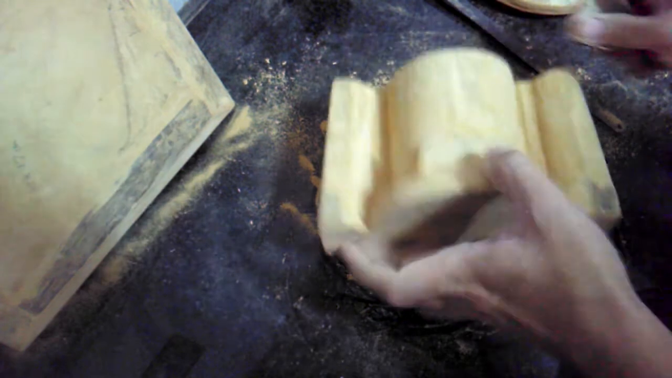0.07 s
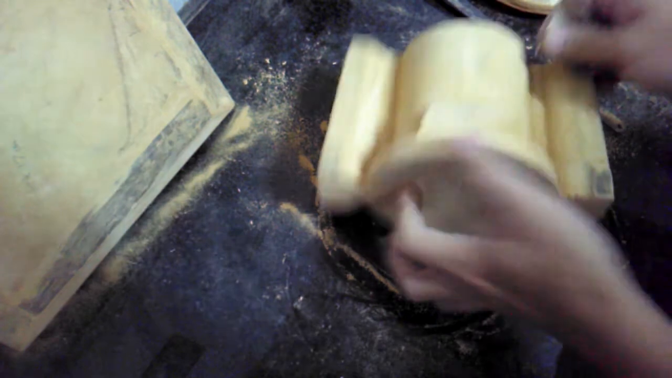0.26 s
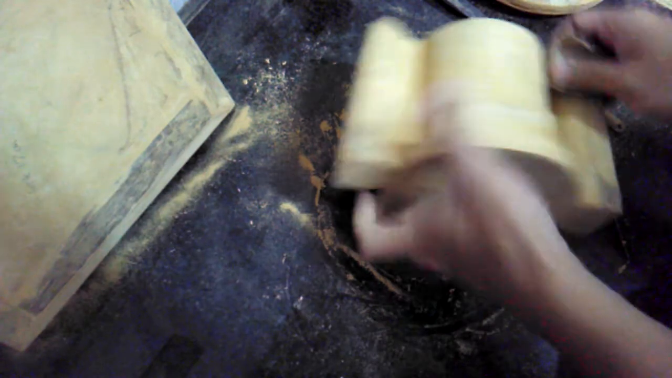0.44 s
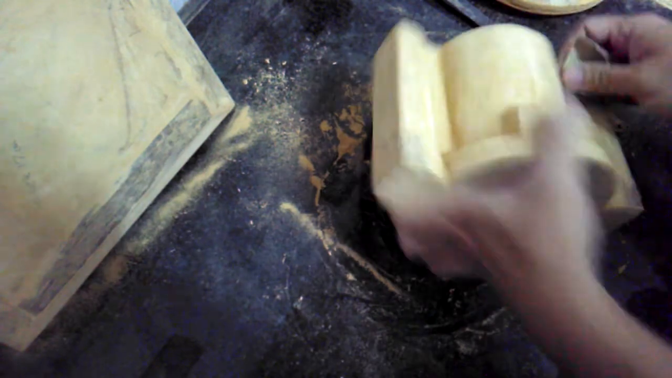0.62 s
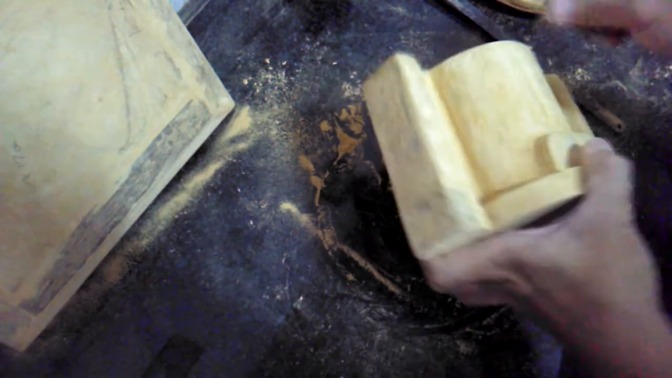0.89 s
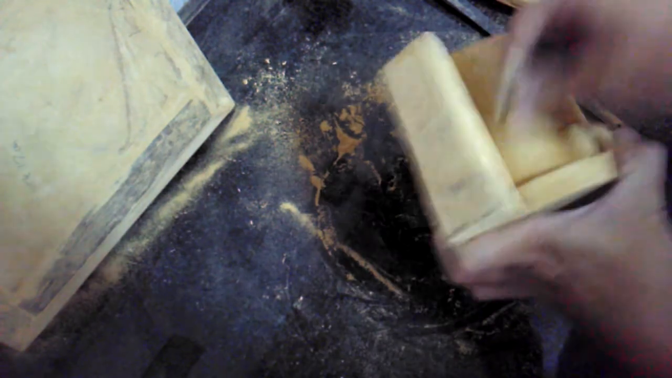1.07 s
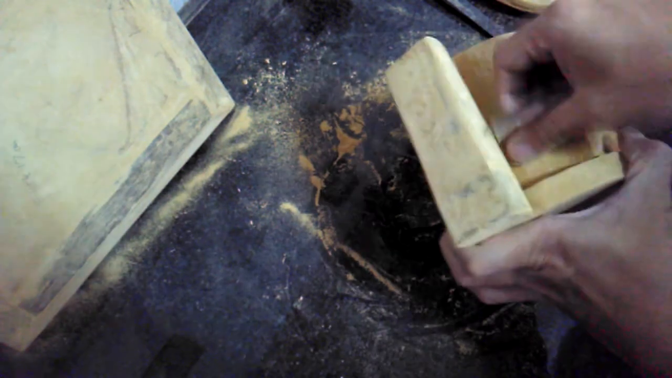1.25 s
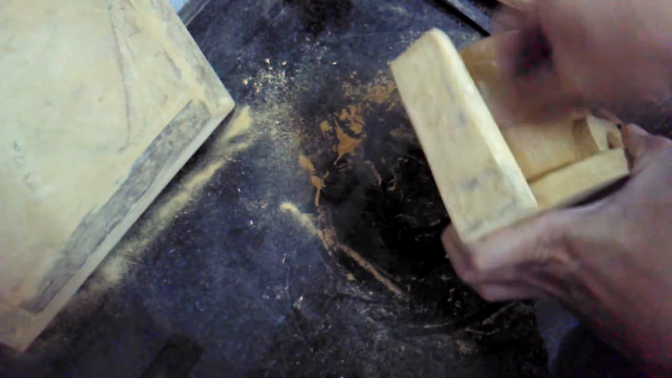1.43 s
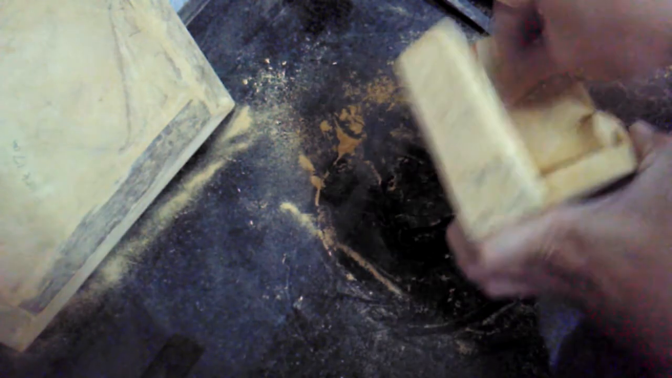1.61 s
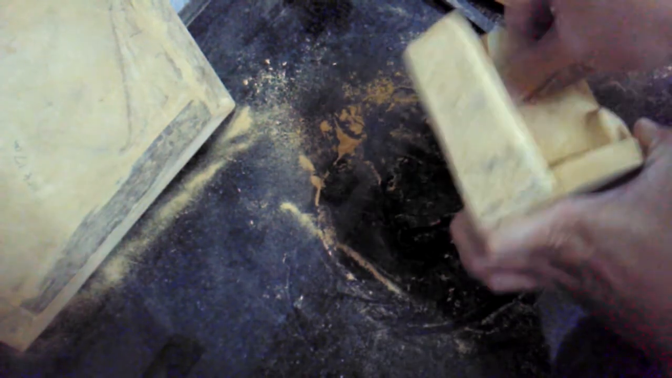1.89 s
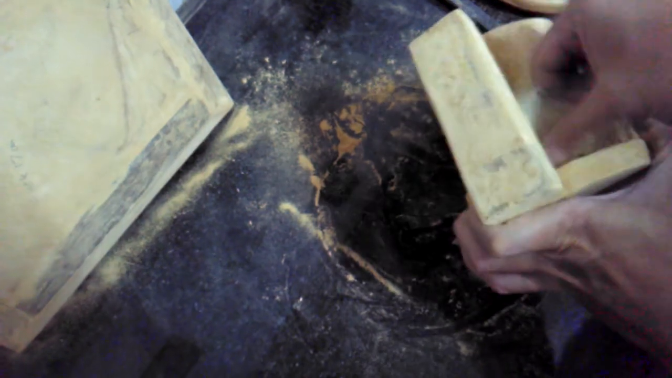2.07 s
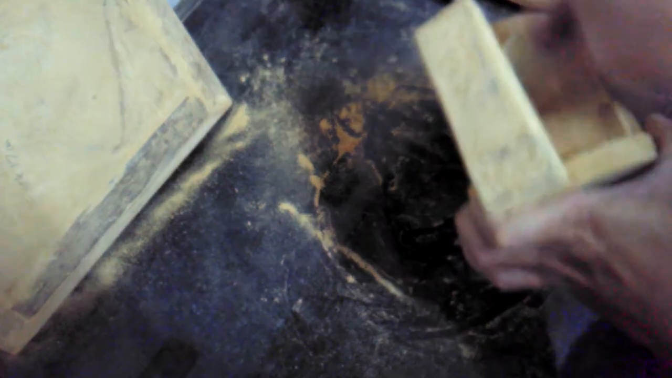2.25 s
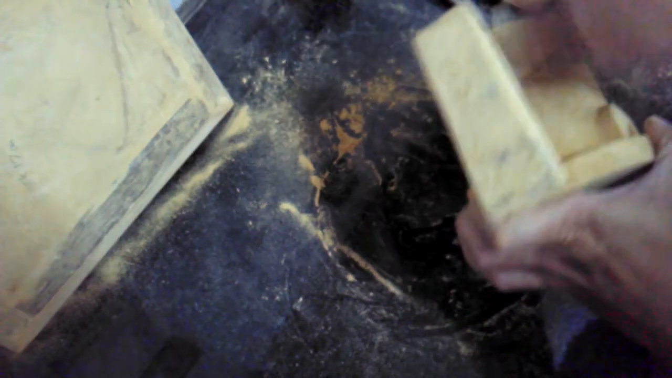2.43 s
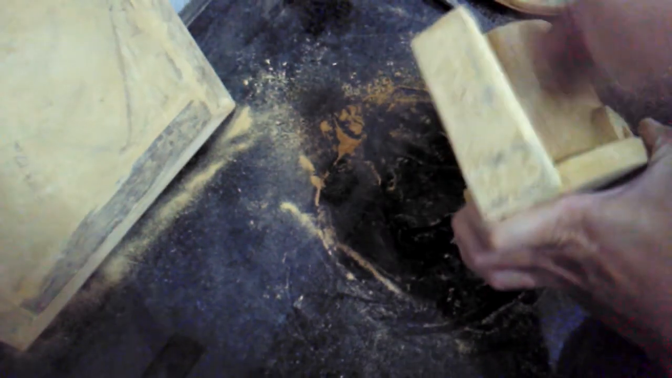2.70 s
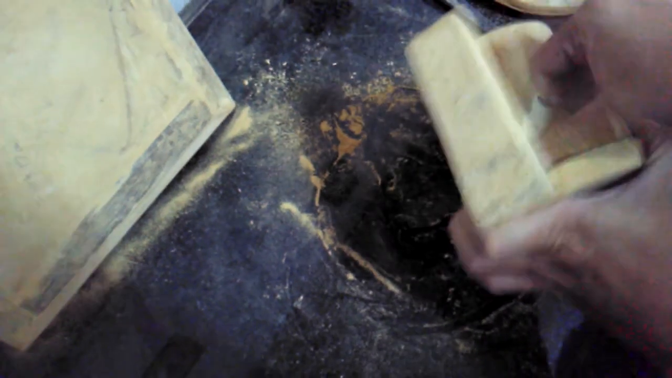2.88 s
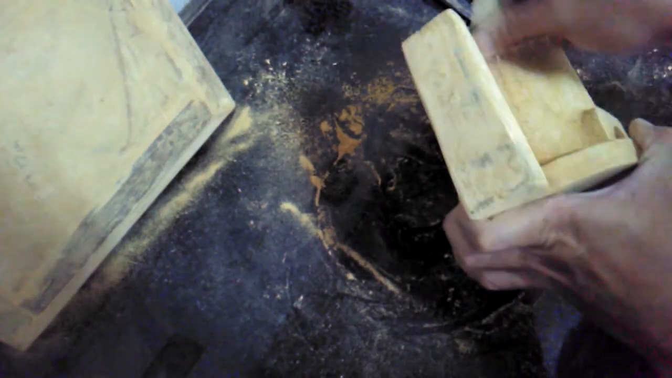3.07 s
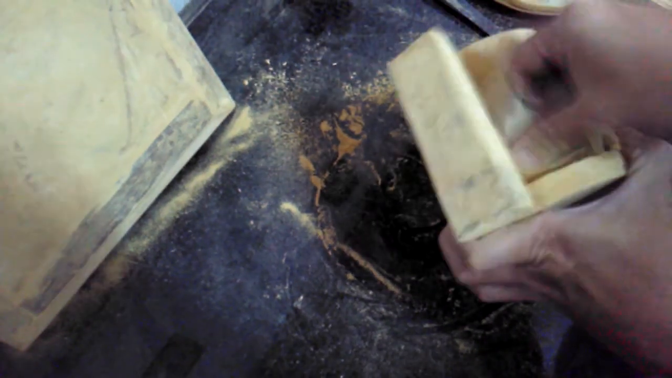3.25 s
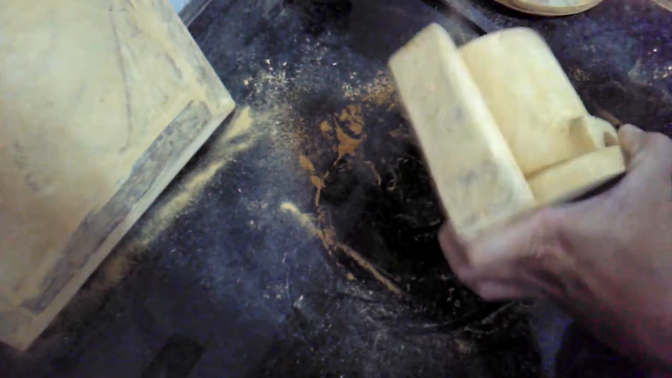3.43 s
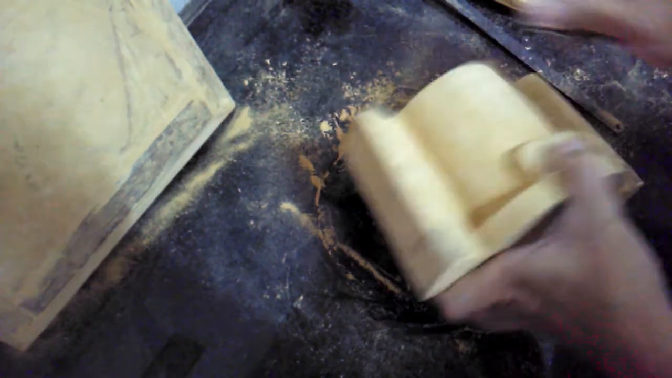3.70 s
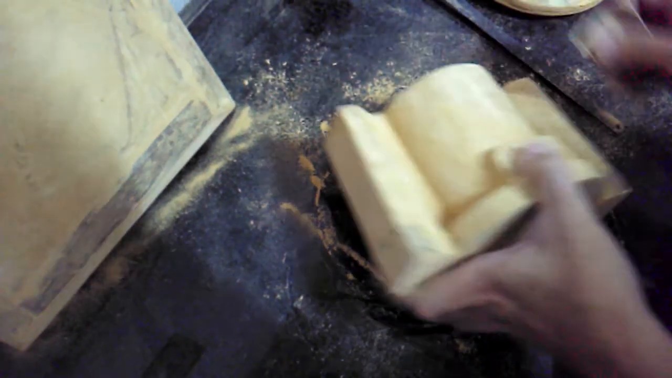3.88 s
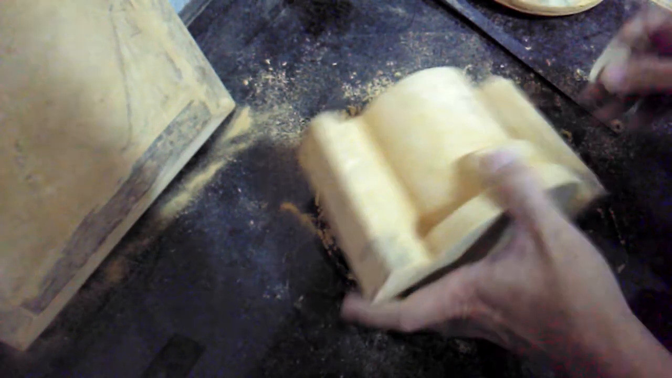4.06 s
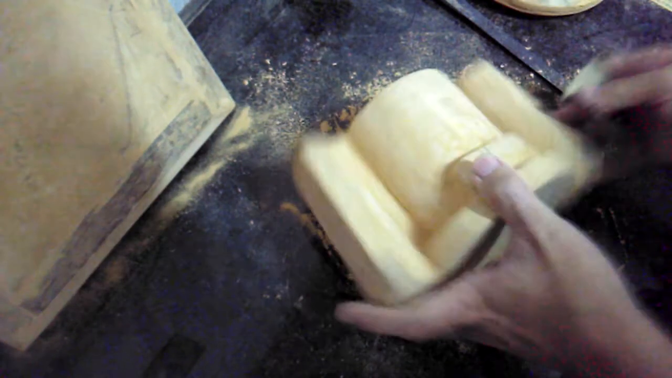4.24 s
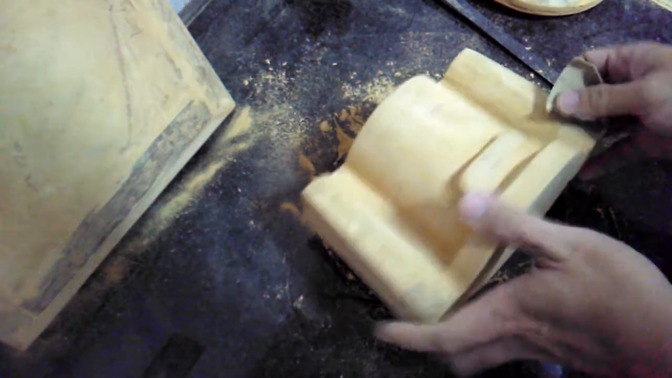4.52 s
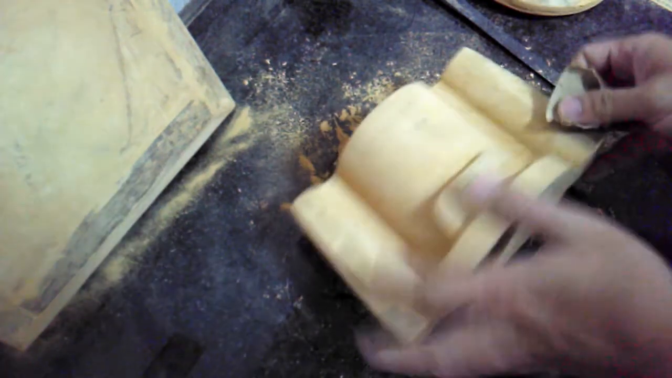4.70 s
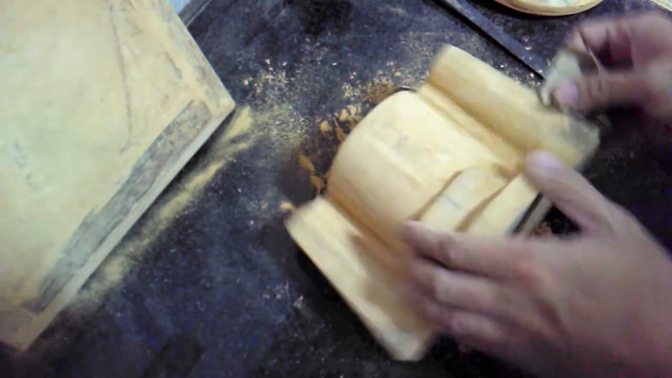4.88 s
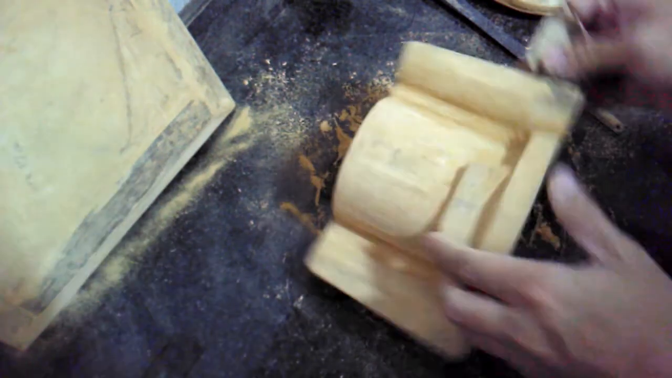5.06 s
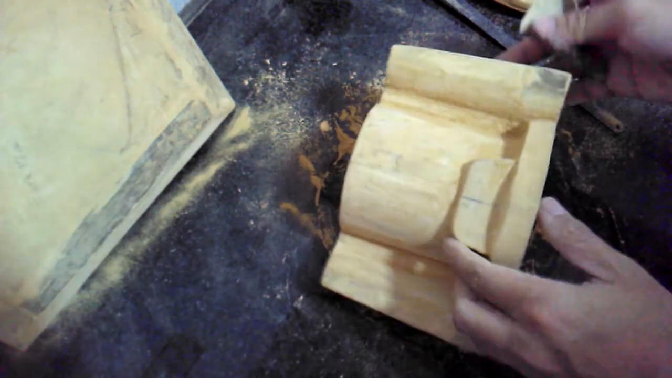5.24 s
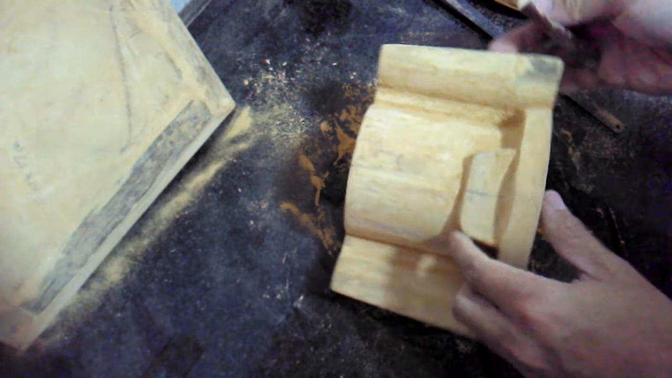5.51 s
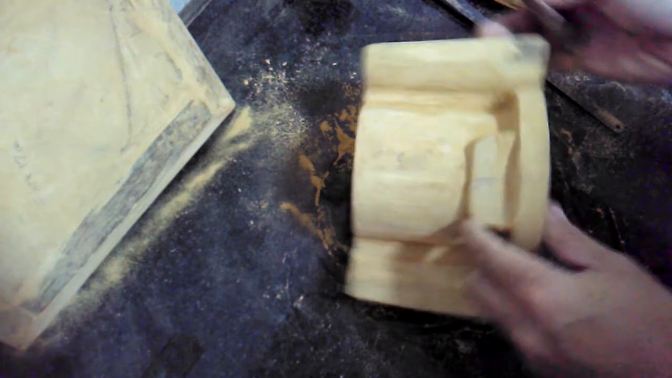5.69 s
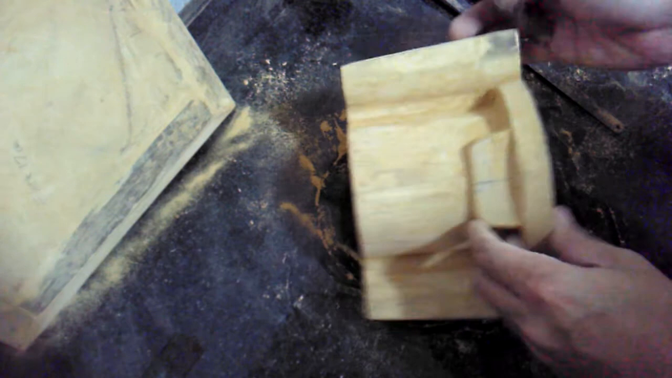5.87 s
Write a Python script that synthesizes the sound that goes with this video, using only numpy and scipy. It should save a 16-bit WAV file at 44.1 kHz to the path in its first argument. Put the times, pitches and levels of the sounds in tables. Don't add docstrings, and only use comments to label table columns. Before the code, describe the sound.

Close to one camera microphone in a small workshop, a hollow wooden piece is turned with faint papery rustles and knocked sharply on the bench. Sandpaper then rubs it in sixteen quick, dry, alternating strokes, the last longer and ending in a loud click off the edge. Afterwards come soft rubs and light knocks, with low outdoor rumble behind and a far engine near the end.

```python
import sys
import numpy as np
from scipy import signal
from scipy.fft import rfft, irfft, next_fast_len
from scipy.io import wavfile
from scipy.ndimage import uniform_filter1d, map_coordinates

SR = 44100
rng = np.random.default_rng(int(sys.argv[2]) if len(sys.argv) > 2 else 0)


def elevation(decibels):
    levels = np.asarray(decibels, float)
    return 10 ** (levels / 20)


def pcm_store(signal):
    levels = np.round(np.clip(np.atleast_2d(signal), -1, 1) * 32767)
    wavfile.write(sys.argv[1], SR, levels.astype(np.int16).T)


N = 261495

# start in seconds, length in seconds, level in dB,
# pressure growth in dB, extra wood contact in dB.
STROKES = [(1.208, 0.085, -59, -15, 0), (1.365, 0.093, -47.5, 2.5, 0), (1.515, 0.077, -40, 11.5, -0.7),
           (1.634, 0.12, -43.5, -8, -2), (1.776, 0.11, -40.5, -1, 0), (1.897, 0.11, -46, 5, -0.8),
           (2.03, 0.11, -42, 17.5, 0.2), (2.142, 0.13, -48, 15, -1), (2.321, 0.096, -43, 12.5, -0.1),
           (2.436, 0.13, -43.5, 4.5, -1), (2.609, 0.13, -40.5, 7, 2), (2.742, 0.13, -43.5, 2.5, 1.2),
           (2.9, 0.11, -38, 0.3, -1.1), (3.02, 0.16, -41, -4.5, 0), (3.189, 0.14, -38, 2, -3.5),
           (3.325, 0.25, -38.5, 11.5, 3)]
# middle band in dB, its growth in dB, upper band in dB,
# bite from 0 to 1, share of the stroke before it grips.
SEATING = [(-13, 2, -13, 0.4, 0.13), (-7, 2, -28, 0.25, 0.25), (-12, 0, -8, 0, .1), (-9, 0, -15, 0.2, .085),
           (-14, 6, -13, 0.1, .12), (-13, -2, -14, 0, .1), (-9, 3, -12.5, 0.24, 0.16),
           (-9.5, -8, -12, 0.3, 0.2), (-13, 0, -14, 0, .1), (-9, -3, -23, 0.23, .19), (-15, 1, -19, 0, .1),
           (-14, 0, -15, 0, 0.11), (-9, 0, -16, 0.1, 0.23), (-8.5, -4, -19, 0.22, .13),
           (-13.5, 4, -13, 0.2, 0.095), (-4.5, 8, -15.5, 0.36, 0.11)]
# wood in dB, fine dust in dB, late lean on the wood in dB, cavity in dB.
PUSH = (-8.5, -15.5, -1, -6.5)
PULL = (-7, -12.5, 2, -2.5)
# centre in Hz, width in Hz, level in dB.
PAPER = [(3670, 270, -18.5), (3860, 380, -4.5), (4400, 370, -6.5), (4900, 350, 1.5), (5530, 580, -6.5),
         (5900, 720, -14.5)]
# centre in Hz, width in Hz, level in dB.
WOOD = [(1696, 517, -8.5), (2314, 286, -1), (2954, 247, 0)]
# centre in Hz, width in Hz, level in dB.
HOLLOW = [(620, 1050, -22), (1068, 310, 5.5)]
# centre in Hz, width in Hz, level in dB.
MIDDLE = [(3320, 330, -1), (3896, 270, 0)]
UPPER = [(5750, 330, 1.5), (6470, 540, -3.5)]
# frequency in Hz, density in dB per Hz.
DUST = [(4120, -31), (7000, -2.5), (7670, -2), (11800, -8), (13900, -12.5), (14500, -19)]
# time in seconds, peak in dB, pitch in Hz, length in seconds.
CATCHES = [(0.657, -65, 1420, 0.002), (0.672, -61, 1520, 0.0026), (1.003, -55, 2650, 0.0019),
           (1.029, -47, 2700, 0.00076), (1.39, -38.5, 3200, 0.0073), (1.51, -41.5, 2300, 0.0063),
           (1.6447, -36, 4640, 0.0023), (2.176, -51, 4650, 0.002), (2.475, -39, 4530, 0.0017),
           (2.9228, -40.5, 5110, 0.0015), (3.204, -41, 4500, 0.002), (3.4525, -19.5, 1960, 0.0031),
           (4.445, -65, 2550, 0.00077)]
# time in seconds, peak in dB, pitch in Hz,
# length in seconds.
TICKS = [
    (5.3, -65, 2600, .001),
    (0.656, -58, 5600, 0.00075),
    (1.2, -58, 5000, .002),
    (1.6445, -47, 8500, .001),
]

# time in seconds, peak in dB, thump in dB, rattle in dB, hollow ring in dB.
KNOCKS = [(0.002, -42.5, -14, -10, 5.5), (0.622, -30.5, -9, -24, -4.5), (0.639, -39.5, -2, -12, -11),
          (0.655, -44.5, -10, -4.5, -9), (0.694, -25.5, -17, -23, 0), (0.814, -14, -32, -16.5, -4),
          (0.827, -21.5, -14.5, -14.5, -7), (0.868, -36, -9.5, -43.5, 15.5), (3.834, -35, -35, -46, 3),
          (4.144, -31, -11.5, -36, 5.5), (5.066, -33, -10.5, -13, -2), (5.083, -41, 0, -26, -11),
          (5.092, -39, -7, -16, -13), (5.119, -34, -6.5, -26, 8.5), (5.565, -61, 8.5, -35, 19)]
# slap in dB, pitch in Hz, length in seconds.
SLAPS = [(-1.5, 177, 0.0025), (3.5, 250, 0.0028), (5, 170, .003), (3, 164, 0.0027), (1.5, 283, 0.0017),
         (0.5, 420, 0.0028), (2.5, 342, 0.0027), (4, 300, 0.0033), (3, 261, 0.0023), (3, 253, 0.0042),
         (2.5, 298, 0.004), (3, 180, .003), (1.5, 210, .003), (3, 244, 0.0039), (1, 98, .003)]
# frequency in Hz, level in dB, time to fall 60 dB in seconds.
BENCH = [(69.1, -4, 0.22), (125.8, -7, 0.18), (185.3, -6.5, 0.15), (232, -12.5, 0.097), (274, 1, 0.083),
         (414.7, 0.5, 0.16), (480.3, 0, 0.075), (540, -7.5, 0.086), (647.4, -4, 0.075), (624, -29.5, 0.91),
         (760, -13, 0.1), (810, -9.5, 0.085), (940, -16, 0.058), (1225, -24, 0.036)]
# frequency in Hz, level in dB, time to fall 60 dB in seconds.
AIR_MODES = [(327.8, -4.5, 0.27), (349.7, -6, 0.37)]
# frequency in Hz, density in dB per Hz.
RATTLE = [(500, -35.5), (850, 7), (1200, 0.5), (1900, -8.5), (3000, -12), (5500, -21), (9000, -53)]
# centre in Hz, width in Hz, level in dB.
CLATTER = [(783, 270, 6), (1080, 116, 1), (1460, 77, -14), (1974, 195, -6)]
# start in seconds, length in seconds, level in dB,
# upper modes in dB.
SKIDS = [
    (.622, .01, -57, -12),
    (0.646, 0.036, -61, -13),
    (0.653, 0.01, -65.5, 8),
    (.671, 0.0079, -72, 9),
    (.696, 0.0091, -61, -3.5),
    (0.833, 0.034, -62.5, -16),
    (4.14, 0.022, -73, -15),
    (5.12, 0.015, -68.5, -21),
]
# centre in Hz, width in Hz, level in dB.
SKID_MODES = [
    [(1100, 64, 0)],
    [(1470, 99, 2.5), (1960, 100, -1.5)],
]

# peak in seconds, rise in seconds, fall in seconds,
# paper in dB, wood over paper in dB.
RUSTLE = [
    [(0.04, 0.058, 0.15, -71.5, -14), (0.18, 0.1, 0.079, -67, -11), (0.245, 0.045, 0.029, -56, -8.5),
     (0.278, 0.031, 0.09, -59, -5.5), (0.398, 0.049, 0.027, -75, -5)],
    [(1.008, .003, 0.079, -58, 3), (1.24, 0.05, 0.16, -71.5, 9.5), (3.54, .07, 0.086, -64, 1)],
    [(3.845, 0.027, .05, -76.5, -19), (4.14, 0.094, 0.076, -71.5, -4.5), (4.28, 0.035, 0.081, -73, 2),
     (4.452, 0.053, 0.11, -74.5, 0.5), (4.56, 0.1, 0.083, -80, 6)],
    [(4.7, .06, 0.097, -78, 4.5), (4.817, 0.018, 0.03, -66, -18), (4.85, 0.073, 0.085, -71.5, 6.5),
     (4.92, 0.035, 0.077, -77, -5)],
    [(5.55, .05, 0.044, -99, 20.5), (5.685, 0.027, 0.16, -73.5, 7.5), (5.775, 0.1, 0.078, -72, 3)],
    [(5.02, 0.033, .04, -77, -6)],
]
# start in seconds, length in seconds, paper in dB,
# wood over paper in dB.
SCRAPES = [
    [],
    [(4.439, 0.044, -80, 13.5)],
    [(4.415, 0.06, -76, -6), (4.592, 0.052, -78, -4)],
    [(4.74, .06, -78.5, 2), (4.802, 0.103, -66, -4)],
    [(5.655, 0.096, -89, 6)],
    [(4.956, 0.12, -81, -5)],
]
# centre in Hz, width in Hz, level in dB.
FOLD = [
    [(3840, 89, -2.5), (4920, 400, -0.5), (5540, 31, -21), (5970, 66, -9)],
    [(4600, 19, 0.5), (4910, 15, 1.5), (5240, 89, 0), (6500, 37, -9)],
    [(3680, 290, 0), (4350, 48, -1.5), (5100, 330, -2), (6000, 63, -5)],
    [(3860, 98, 2.5), (5000, 230, 5.5), (5550, 71, 4), (6200, 180, 0)],
    [(3600, 220, -1), (4150, 120, 2), (5450, 300, -0.5), (6450, 160, 0)],
    [(3700, 40, 5), (4900, 200, -12)],
]
# centre in Hz, width in Hz, level in dB.
FACE = [
    [(1600, 100, 1), (2290, 100, 1), (2890, 90, -0.5)],
    [(1410, 97, -34.5), (2440, 50, 0.5), (2920, 49, -5)],
    [(1744, 60, 5), (2240, 360, 3.5), (2520, 49, 4), (2720, 29, -4.5)],
    [(930, 43, -3.5), (1780, 150, -9.5), (2300, 41, -3.5), (2900, 110, 0)],
    [(2010, 210, 0), (2800, 73, -1.5)],
    [(1900, 200, 0), (2900, 150, -2)],
]
# peak in seconds, rise in seconds, fall in seconds, level in dB.
HANDLING = [
    (0.2, 0.47, 0.37, -89),
    (1.1, 0.44, 0.68, -80),
    (3.7, 0.33, 0.79, -84.5),
    (4.6, 0.78, 0.89, -77.5),
    (5.8, 0.18, 0.67, -80),
]

# frequency in Hz, time to fall 60 dB in seconds.
ROOM = [(200, 0.25), (2000, 0.4), (5000, 0.33), (12000, 0.44)]
# peak in seconds, half length in seconds, level in dB.
ENGINE = [
    [(5.85, 0.032, -58.5)],
    [(5.6, 0.14, -53), (5.86, 0.08, -56.5)],
    [(5.35, 0.13, -51.5), (5.66, 0.094, -50.5), (5.93, .07, -54)],
    [(5.58, 0.22, -60.5), (5.92, 0.059, -57)],
]
# peak in seconds, half length in seconds, level in dB.
UPPER_ORDERS = [
    (5.703, 0.066, -64.5),
    (5.896, 0.091, -66.5),
]
# time in seconds, turns in Hz.
SHAFT = [(5.2, 49.5), (5.45, 47.7), (5.72, 47.27), (5.93, 48.3)]
# time in seconds, level in dB.
TRAFFIC = [(0.0, -63.5), (0.51, -66.5), (0.79, -56), (0.92, -62), (1.05, -64), (1.82, -66.5), (2.51, -59),
           (2.84, -66.5), (3.38, -64.5), (3.47, -60), (3.58, -63.5), (3.78, -68), (4.33, -63.5),
           (4.98, -66.5), (5.22, -61.5), (5.47, -72), (5.93, -62)]
# frequency in Hz, density in dB per Hz.
RUMBLE = [(20, -57), (33, -2), (48, -1), (68, 3.5), (110, -2), (160, -3), (200, -16), (300, -79)]
# frequency in Hz, density in dB per Hz.
DRONE = [(110, -45.5), (160, -7), (230, 3), (290, -6), (360, -24), (600, -71)]
# frequency in Hz, density in dB per Hz.
MURMUR = [(200, -23), (330, 4.5), (480, 2.5), (640, 0.5), (780, -3), (950, 0), (1300, -39), (2200, -22)]
# peak in seconds, half length in seconds, level in dB.
WHISTLE = [(4.2, .06, -82), (4.43, 0.096, -81), (4.83, 0.064, -86), (5.182, .09, -85.5), (5.41, 0.12, -86)]
# frequency in Hz, density in dB per Hz.
HISS = [(600, -30), (1200, 4), (2500, -0.5), (3300, -5.5), (4300, -2.5), (5200, -9), (7000, -18),
        (10000, -24), (14500, -35.5)]
# time in seconds, level in dB.
HISS_LEVEL = [(0, -82), (1, -78.5), (3.7, -81.5), (4.4, -81), (5.2, -82), (5.93, -83)]
# frequency in Hz, share of time the noise sounds in
SIDE_NOISE = [(4300, 0), (4700, .07), (5700, .27), (6900, .88), (9000, .92), (14000, .6)]


def unit(x):
    return x / np.sqrt(np.mean(x ** 2) + 1e-20)


def along(points, hz):
    f, v = np.transpose(points)
    return np.interp(np.log(hz + 1), np.log(f + 1), v)


def curve(rows):
    s, value = np.transpose(rows)
    return np.interp(np.arange(N) / SR, s, value)


def wobble(rate):
    knots = rng.standard_normal(3000)
    position = np.arange(0, N + 16, 16) * min(rate, 400) / SR
    return map_coordinates(knots, [position]).repeat(16)[:N]


def swell(s, rise, fall):
    t = np.arange(N) / SR - s
    roundness = 0.92
    return elevation(-18 * np.abs(t / np.where(t < 0, rise, fall)) ** roundness)


def held(s, length, edge_s):
    t = np.arange(N) / SR - s
    return np.clip(np.minimum(t, length - t) / edge_s + .5, 0, 1) ** 2


def filtered(x, response):
    m = next_fast_len(N + 8192)
    return irfft(rfft(x, m) * response(np.fft.rfftfreq(m, 1 / SR)), m)[..., :N]


def resonant(x, modes):
    def response(f):
        power = 0
        for hz, width, db in modes:
            power = power + elevation(2 * db) / (1 + ((f - hz) / width) ** 2) ** 2
        return np.sqrt(power)
    return unit(filtered(x, response))


def coloured(x, spectrum):
    return unit(filtered(x, lambda f: elevation(along(spectrum, f))))


def grit(spiky_db, clump_db, patchy_db):
    sizes = elevation(spiky_db * rng.exponential(size=N) + clump_db * wobble(250))
    z = signal.stft(sizes * rng.standard_normal(N), nperseg=256)[2]
    fast, slow = rng.standard_normal((2, *z.shape))
    fast = uniform_filter1d(uniform_filter1d(fast, size=5, axis=0), size=2, axis=1)
    slow = uniform_filter1d(uniform_filter1d(slow, size=3, axis=0), size=25, axis=1)
    patches = elevation(patchy_db * (0.78 * unit(fast) + unit(slow)))
    return unit(signal.istft(z * patches, nperseg=256)[1][:N])


def sanding():
    usual_db = -43
    wood_lags, dust_lags = 0.414, 0.033
    bite_s, edge_s = 0.0045, 3.461
    paper, wood, hollow, dust, middle, upper = np.zeros((6, N))
    for k, (stroke, seat) in enumerate(zip(STROKES, SEATING)):
        s, length, db, growth_db, extra_db = stroke
        middle_db, rise_db, upper_db, bite, slack = seat
        wood_db, dust_db, lean_db, cavity_db = PULL if k % 2 else PUSH
        harder_db = db - usual_db
        wood_db = wood_db + extra_db - wood_lags * harder_db
        dust_db = dust_db - dust_lags * harder_db + 0.11 * (growth_db - 14.5)

        u = np.linspace(0, 1, round(length * SR))
        span = slice(round(s * SR), round(s * SR) + len(u))
        arc = np.sin(np.pi * u)
        shape = np.abs(arc)
        grip = bite * np.clip((u - slack) * length / bite_s, 0, 1) * (u < .5)
        speed = shape + grip * (1 - shape) - bite * shape * (u < slack)
        on_wood = np.clip((edge_s - s - u * length) / 0.0071 + .5, 0, 1)
        speed = speed * elevation(db + growth_db * (u - .5)) * on_wood

        paper[span] += speed * elevation(-0.75)
        middle[span] += speed * elevation(middle_db + rise_db * (u - .5))
        upper[span] += speed * elevation(upper_db)
        wood[span] += speed * elevation(wood_db + 2.0 + lean_db * (u - .5))
        hollow[span] += speed * elevation(1.64 * wood_db + cavity_db + 27.6 * (u - 1.0))
        threshold = .22 + np.clip(-0.031 * harder_db, 0, .2)
        fast_enough = np.clip((arc - threshold) * 3.1, 0, 1)
        dust[span] += speed * elevation(dust_db + 1.3) * fast_enough / (0.23 + arc) ** 0.38

    grains = grit(spiky_db=1.8, clump_db=1.0, patchy_db=2.0)
    fine = grit(spiky_db=0.86, clump_db=0.0, patchy_db=2.0)
    body = paper * resonant(grains, PAPER) + wood * resonant(grains, WOOD) + hollow * resonant(grains, HOLLOW)
    body = body + middle * resonant(fine, MIDDLE) + upper * resonant(fine, UPPER)
    return body + dust * coloured(fine, DUST)


def catches(rows):
    out, t = np.zeros(N + SR), np.arange(SR // 20) / SR

    def mode(hz):
        return np.sin(2 * np.pi * hz * t) * elevation(-60 * t / .003) * (1 - np.exp(-t / .0003))

    for s, db, hz, length in rows:
        burst = rng.standard_normal(len(t)) * t / length * np.exp(1 - t / length)
        modes = mode(hz) + mode(1.35 * hz) + .3 * mode(.72 * hz)
        ring = signal.fftconvolve(burst, modes)[:len(t)]
        snag = ring / np.abs(ring).max() + .15 * (hz / 5000) ** 3 * burst
        out[round((s - .001) * SR):][:len(t)] += elevation(db - 2.0) * snag
    return filtered(out[:N], lambda f: 1 / (1 + (1000 / (f + 1)) ** 6))


def knocks():
    out, rattle, t = np.zeros(N + SR), np.zeros(N + SR), np.arange(SR // 2) / SR
    hz, level_db, t60 = np.transpose(BENCH + AIR_MODES)[:, :, None]
    fading = elevation(-60 * t / t60) * (1 - np.exp(-t / 0.0018))
    rattle_fade = (elevation(-60 * t / 0.034) + elevation(-18.5 - 60 * t / 0.15)) * (1 - np.exp(-t / 0.00066))
    thumping, hollow, clattering = hz < 140, abs(hz - 340) < 30, hz > 560
    for (s, db, thump_db, rattle_db, ring_db), (slap_db, slap_hz, slap_s) in zip(KNOCKS, SLAPS):
        contact_ms = 2.41 * elevation(-.27 * (db + 32))
        mode_db = level_db + rng.normal(0, 2, hz.shape)
        mode_db = mode_db + thumping * (thump_db + 16.0) + hollow * ring_db
        mode_db = mode_db + clattering * 0.67 * (rattle_db + 18.5)
        phase = rng.uniform(0, 2 * np.pi, hz.shape)
        ring = (elevation(mode_db) * fading * np.sin(2 * np.pi * hz * t + phase)).sum(0)

        turn = 2 * np.pi * t * slap_hz
        slap = elevation(slap_db + 6.5) * (np.sin(turn) + 0.32 * np.sin(1.743 * turn))
        slap = slap * t / slap_s * np.exp(1 - t / slap_s)

        force = np.hanning(3 + round(contact_ms * SR / 1500))
        blow = np.convolve(slap + ring, force / force.sum())[:len(t)]
        start = round((s + 0.0006) * SR)
        out[start:][:len(t)] += elevation(db - 11.0) * blow
        rattle[start:][:len(t)] += elevation(db + rattle_db - 9.5) * rattle_fade
    shake = rng.standard_normal(N)
    return out[:N] + rattle[:N] * (coloured(shake, RATTLE) + 0.65 * resonant(shake, CLATTER))


def skids():
    lower, upper = (resonant(rng.standard_normal(N), modes) for modes in SKID_MODES)
    out = np.zeros(N)
    for s, length, db, upper_db in SKIDS:
        out += elevation(db) * held(s, length, edge_s=0.0084) * (lower + elevation(upper_db) * upper)
    return out


def broadened(modes):
    return [(hz, 150 + .5 * width, db) for hz, width, db in modes]


def rustle():
    out, grains = np.zeros(N), grit(spiky_db=2.5, clump_db=0.5, patchy_db=2.5)
    dust = elevation(-13.5) * coloured(grains, DUST)
    cavity = elevation(-23) * resonant(grains, HOLLOW[1:])
    for slides, scrapes, fold, face in zip(RUSTLE, SCRAPES, FOLD, FACE):
        sheet = resonant(grains, broadened(fold)) + dust
        bare = resonant(grains, broadened(face)) + cavity
        for s, rise, fall, db, wood_db in slides:
            out += elevation(db) * swell(s, rise, fall) * (sheet + elevation(wood_db) * bare)
        for s, length, db, wood_db in scrapes:
            out += elevation(db) * held(s, length, edge_s=.012) * (sheet + elevation(wood_db) * bare)
    return out


def handling():
    grains = grit(spiky_db=0.4, clump_db=1.5, patchy_db=2.5)
    creep = sum(elevation(db) * swell(s, rise, fall) for s, rise, fall, db in HANDLING)
    creep = creep * elevation(1.0 + 2.5 * wobble(20))
    return creep * (resonant(grains, WOOD + PAPER + HOLLOW[1:]) + elevation(-9.5) * coloured(grains, DUST))


def room(x):
    hz, t, z = signal.stft(rng.standard_normal(SR // 2), SR, nperseg=256)
    tail = signal.istft(z * elevation(-60 * t / along(ROOM, hz)[:, None]), SR, nperseg=256)[1]
    return signal.fftconvolve(np.pad(x, (300, 0)), tail / np.linalg.norm(tail))[:N]


def engine():
    turn = 2 * np.pi * np.cumsum(curve(SHAFT)) / SR
    pull = sum(elevation(db) * swell(s, half, half) for s, half, db in UPPER_ORDERS)
    out = pull * resonant(rng.standard_normal(N), [(440, 45, 0.5)])
    for order, rows in enumerate(ENGINE, start=3):
        heard = sum(elevation(db + 2.0) * swell(s, half, half) for s, half, db in rows)
        out = out + heard * elevation(1.4 * wobble(22)) * np.sin(order * turn + 0.68 * wobble(25))
    return out


def outdoors():
    traffic_db = curve(TRAFFIC)
    swing_db, gust = traffic_db - traffic_db.mean(), wobble(7)
    rumble_db = traffic_db + 5.0 + 2.4 * gust + 3.0 * wobble(25)
    drone_db = -70.5 + 0.78 * swing_db + 1.7 * gust
    murmur_db = -72.5 + 0.2 * swing_db + 2.7 * wobble(3.9)
    rumble = elevation(rumble_db) * coloured(rng.standard_normal(N), RUMBLE)
    drone = elevation(drone_db) * coloured(rng.standard_normal(N), DRONE)
    murmur = elevation(murmur_db) * coloured(rng.standard_normal(N), MURMUR)
    return rumble + drone + murmur


def whistle():
    heard = sum(elevation(db + 3.0) * swell(s, half, half) for s, half, db in WHISTLE)
    return heard * np.sin(2 * np.pi * np.cumsum(4150 + 8 * wobble(3.1)) / SR)


def room_hiss():
    return elevation(curve(HISS_LEVEL) + 0.23 * wobble(7)) * coloured(rng.standard_normal(N), HISS)


def scene():
    scratch, snags, blows = sanding(), catches(CATCHES), knocks()
    small = skids() + catches(TICKS)
    close = scratch + snags + blows + small + rustle() + handling()
    echo = room(elevation(-12) * scratch + elevation(-17.5) * snags + elevation(-8.0) * blows) + room(elevation(-8.5) * small)
    mono = close + echo + engine() + outdoors() + whistle() + room_hiss()
    return np.array([mono, mono])


def band_limit(x):
    return signal.sosfilt(signal.butter(12, 14640, fs=SR, output="sos"), x)


def record(dry):
    hz, t, z = signal.stft(dry[0], SR, nperseg=1024)
    band = (np.log(hz + 500) * 9).astype(int)
    chance = uniform_filter1d(rng.standard_normal((band.max() + 1, len(t))), 5, axis=1)
    rank = chance.argsort(1).argsort(1) / len(t)
    noisy = rank[band] < along(SIDE_NOISE, hz)[:, None]
    noise = rng.standard_normal(z.shape) + 1j * rng.standard_normal(z.shape)
    smooth = np.sqrt(np.abs(uniform_filter1d(np.abs(z) ** 2, 9, axis=0)) / 2)
    side = elevation(-4.5) * signal.istft(noisy * smooth * noise, SR, nperseg=1024)[1][:N]

    def microphone(f):
        return (f < 14330) * (1j * f / (30 + 1j * f)) ** 2

    mix = filtered(dry + [side, -side], microphone)
    return band_limit(mix)


dry = scene()
out = record(dry)
pcm_store(out)
```